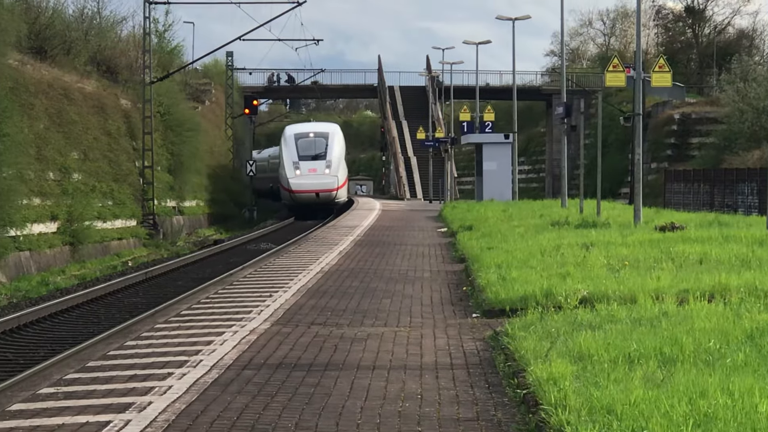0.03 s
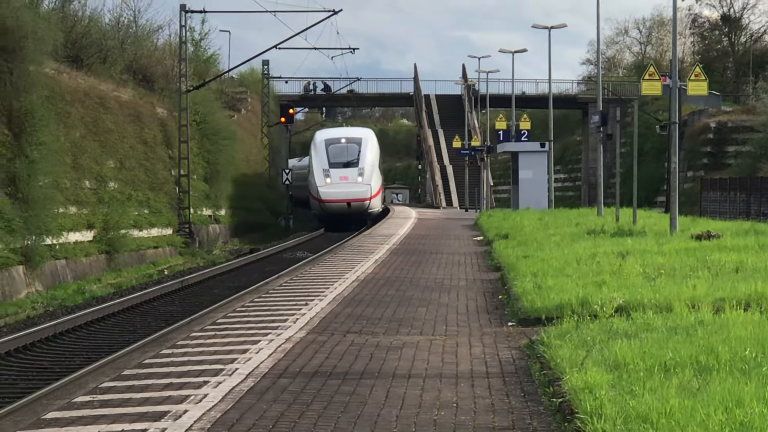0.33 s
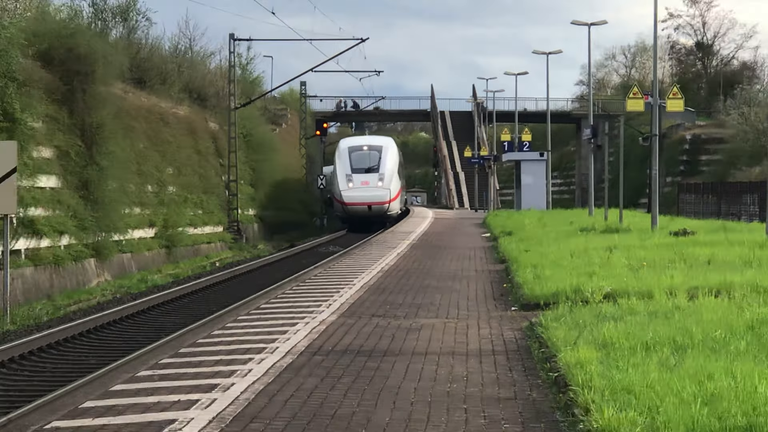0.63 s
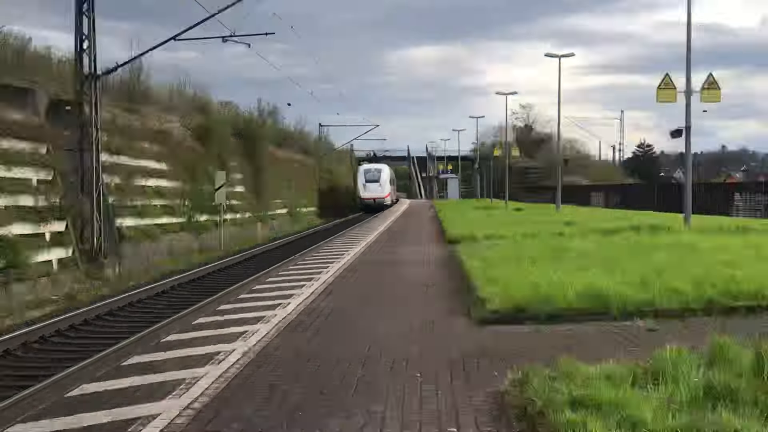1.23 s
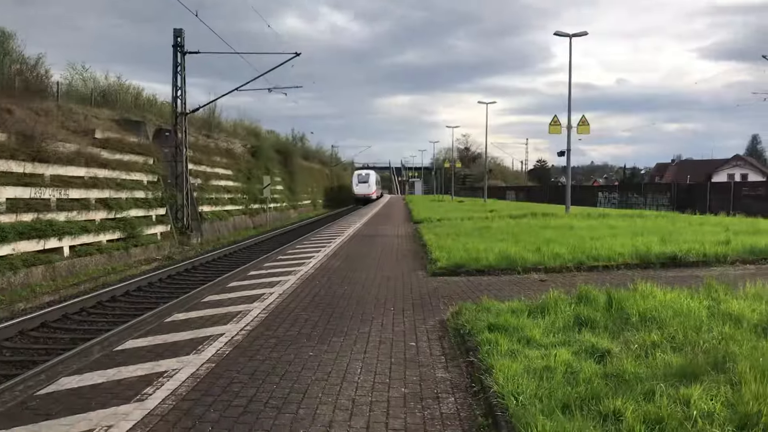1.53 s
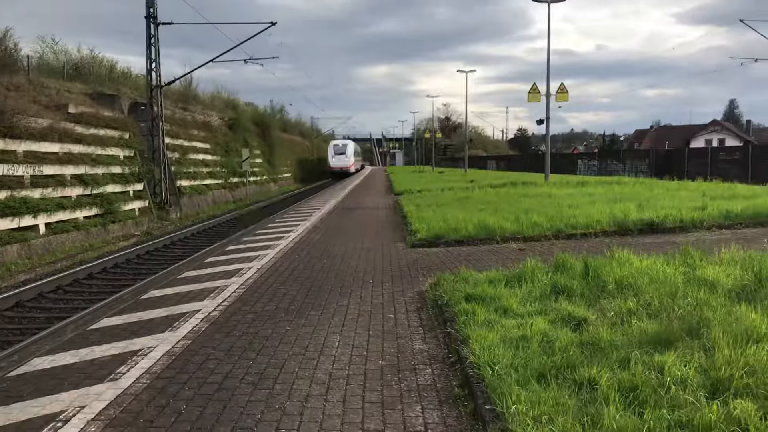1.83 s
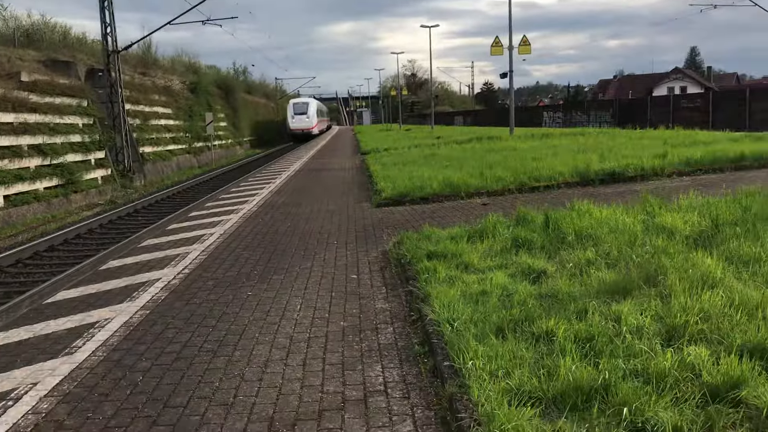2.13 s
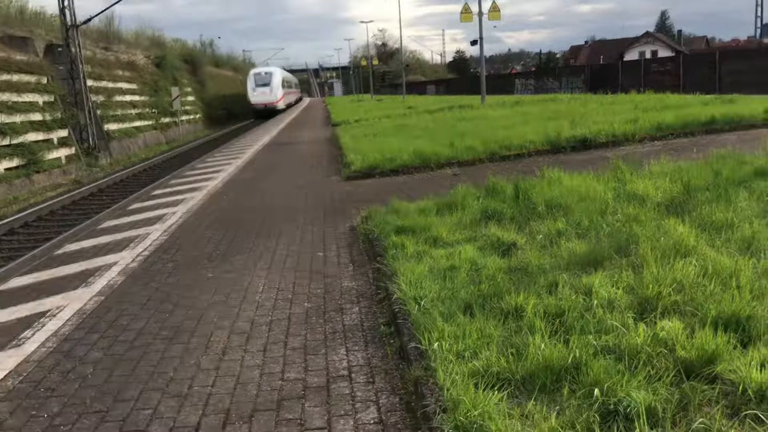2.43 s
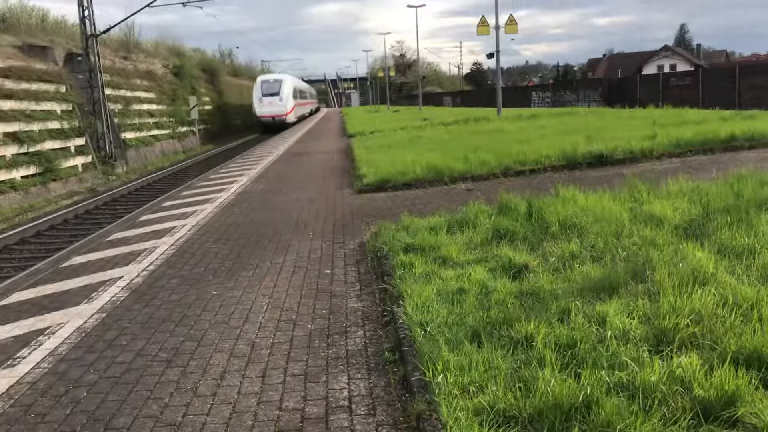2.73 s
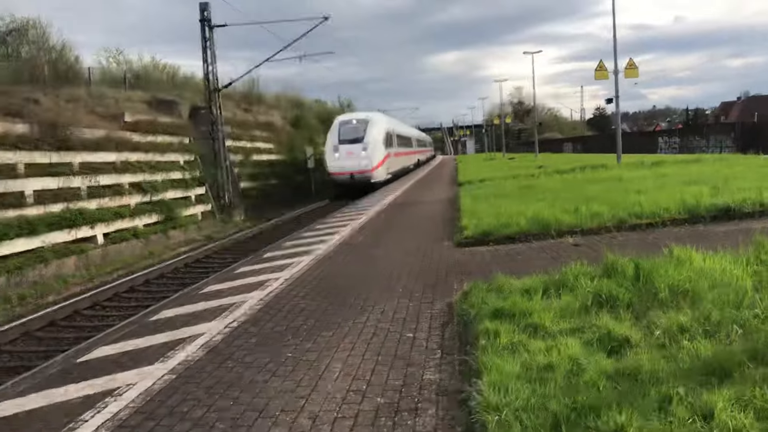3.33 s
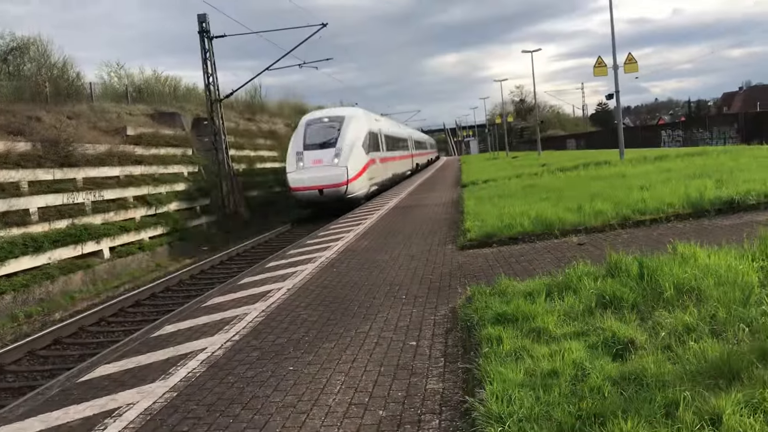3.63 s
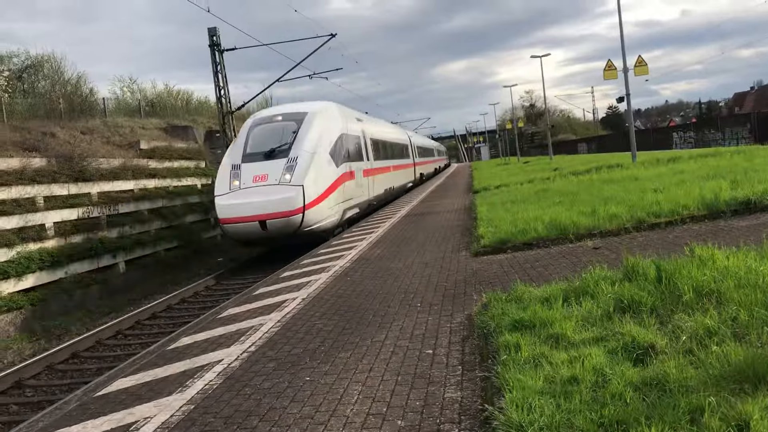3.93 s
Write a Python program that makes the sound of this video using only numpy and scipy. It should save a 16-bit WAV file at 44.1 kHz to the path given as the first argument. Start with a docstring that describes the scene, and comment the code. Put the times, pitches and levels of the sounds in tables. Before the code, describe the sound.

An electric train nears an open-air platform, its rushing wheel noise growing beneath a high metallic ringing and thin sizzle from the rails. Low gusts buffet the microphone, and a very brief hoot comes near the end.

```python
"""Fast electric train nearing a platform

Out in the open air, the wheels set the rails singing and hissing well ahead of the train.
The song spreads downward as the roar of wheels and air swells, with a few ticks and a brief hoot.
Gusts buffet the microphone with low thumps and rough puffs, over a steady distant rumble."""
import sys
import numpy as np
from scipy import signal
from scipy.io import wavfile
from scipy.ndimage import uniform_filter1d

SR = 44100
rng = np.random.default_rng(int(sys.argv[2]) if len(sys.argv) > 2 else 0)


def int16_out(signal):
    """Quantize to a 16-bit WAV file."""
    q = np.round(np.clip(np.atleast_2d(signal).T, -1, 1) * 32767)
    wavfile.write(sys.argv[1], SR, q.astype(np.int16))


N = 176400
T = np.arange(N) / SR

# Tone of the distant outdoor bed. Each row: frequency in Hz, relative level in dB.
AMBIENCE_EQ = [(20, -18), (45, 9.5), (62, 9.5), (85, -4), (130, -7), (200, -7.5), (330, -17.5), (480, -25),
               (680, -11), (850, -12.5), (1400, -18), (1900, -24.5), (2600, -31.5), (8000, -49)]

# Rise and fall of the gusts. Each row: time in seconds, level in dB.
GUST_LEVEL = [(0, -57), (.22, -25.5), (.3, -36), (.55, -22.5), (.66, -42), (.75, -31), (.86, -65),
              (1.3, -47), (1.43, -29), (1.6, -59), (1.85, -35.5), (2.1, -48), (2.35, -51), (2.56, -26),
              (2.68, -34), (2.9, -35), (3.45, -32), (3.7, -34), (4, -26)]
# Bass-heavy tone of the gusts. Each row: frequency in Hz, relative level in dB.
GUST_EQ = [(20, -33), (35, 11), (50, 3.5), (80, -0.5), (150, -6.5), (250, -17.5), (400, -26.5), (700, -56),
           (2000, -68)]
# Eddies thumping the microphone. Each row: peak time in seconds, relative peak in dB, pitch in Hz.
EDDY_HITS = [(.217, -19.5, 125), (.248, -22, 108), (0.352, -24, 115), (.386, -22, 82), (.463, -17.5, 207),
             (.490, -18.5, 159), (.502, -13.5, 74.6), (.513, -19.5, 193), (0.53, -25, 84),
             (0.607, -28.5, 72), (0.753, -26, 75.4), (.937, -19, 84.5), (1.405, -21.5, 87),
             (1.418, -22, 123), (1.459, -31, 95), (1.494, -24, 87), (1.816, -24, 87.6), (1.863, -19, 111),
             (2.41, -26, 71.5), (2.533, -17, 71.6), (2.558, -13.5, 91), (2.616, -31, 81), (2.755, -20, 72),
             (2.811, -23.5, 96), (2.888, -23, 92), (2.943, -17.5, 67.6), (3.031, -22, 122),
             (3.159, -20.5, 90), (3.26, -22, 83), (3.306, -13.5, 75.5), (3.516, -15, 108),
             (3.567, -27.5, 102), (3.691, -22, 89), (3.827, -20.5, 63.4)]
# Puffs from the hardest eddies. Each row: peak time in seconds, level in dB, half-width in seconds.
PUFF_HITS = [(.462, -25, 0.0028), (0.482, -29, 0.0019), (0.498, -23.5, 0.0035), (0.507, -35, .003),
             (0.543, -39, 0.0072), (2.554, -32, 0.0018), (3.514, -21, 0.0024)]
# Dull tone of the puffs. Each row: frequency in Hz, relative level in dB.
PUFF_EQ = [(100, -1), (220, 13.5), (400, -3), (600, -10.5), (800, -22), (1500, -45), (5000, -85)]

# Bright ticks. Each row: peak time in seconds, level in dB, half-width in seconds, low and high cut in Hz.
TICK_HITS = [(1.506, -51, 0.0025, 5000, 6400), (2.144, -43.5, 0.0077, 400, 4000),
             (2.1455, -40, .002, 7000, 15500), (2.148, -35.5, 0.001, 6800, 15500)]
# The hoot: peak time in seconds, half-width in seconds, pitch in Hz, glide in Hz per second.
HOOT_NOTE = (3.63, .024, 362, -650)

# Swell of wheels and rushing air. Each row: time in seconds, level in dB.
ROAR_LEVEL = [(0, -80), (1, -56.5), (2, -49), (2.6, -46), (3.1, -42), (3.45, -38), (3.7, -34.5), (4, -33)]
# Tone of the roar. Each row: frequency in Hz, relative level in dB.
ROAR_EQ = [(60, -1), (200, 1), (330, -2.5), (490, -10), (660, 1.5), (1150, -18.5), (1450, -1.5), (1700, -3),
           (2100, -4), (2500, -7.5), (2900, -11), (4200, -12.5), (5000, -13.5), (6800, -16), (8000, -20),
           (9500, -17.5), (10400, -21.5), (11500, -18), (16000, -36)]

# Hiss carried along the rails. Each row: time in seconds, relative level in dB.
HISS_LEVEL = [(0, -53.5), (.3, -51.5), (.8, -51.5), (1.25, -49.5), (1.7, -49.5), (2.05, -49), (2.3, -50.5),
              (2.65, -51.5), (3.15, -47.5), (3.5, -48.5), (3.8, -50), (4, -46)]
# Separate bright bands of the hiss. Each row: frequency in Hz, relative level in dB.
HISS_EQ = [(1500, -15), (2500, -10), (4200, -5.5), (4950, -12.5), (5300, -6), (5700, -12), (6550, -17),
           (7100, -3.5), (7650, -33), (8800, -32), (9550, -12), (9900, -15.5), (11000, -11.5),
           (12200, -5.5), (12900, -0.5), (14500, -2), (15300, 1.5), (16000, -4.5)]
# Thin whistles inside the hiss. Each row: frequency in Hz, width in Hz, boost in dB.
HISS_WHISTLES = [(5340, 60, 4), (9600, 60, 6), (13130, 50, 4), (14177, 35, 8), (14962, 30, 7),
                 (15277, 50, 6)]
# Surges of the highest hiss. Each row: start in seconds, level in dB, length in seconds.
HISS_SURGES = [(1.2, -48, .06), (1.822, -47, 0.12), (3.12, -53, .09)]
# Airy tone of the surges. Each row: frequency in Hz, relative level in dB.
SURGE_EQ = [(9000, -35), (11000, -7), (12500, 5), (15300, 6), (16000, -15)]

# A higher rail resonance that joins as the train nears. Each row: time in seconds, level in dB.
OVERTONE_LEVEL = [(0, -69), (1.2, -61), (1.9, -60), (2.45, -47.5), (2.8, -55.5), (3.5, -44), (4, -49)]
# Resonances of the singing rails. Each row: frequency in Hz, width in Hz, boost in dB.
RAIL_RESONANCES = [(674, 18, 7), (770, 6, 9), (845, 14, 4), (896, 16, 7), (950, 12, 4), (1000, 7, 12),
                   (1045, 12, 8), (1101, 11, 10), (1157, 10, 9), (1195, 10, 6), (1216, 10, 5),
                   (1244, 11, 9), (1372, 22, 6)]
# Arc of the rail song. Each row: time in seconds, level in dB, lower and upper band edge in Hz.
SONG_ARC = [(0, -40.5, 1160, 1290), (.5, -38, 1066, 1280), (1.02, -37.5, 1105, 1290),
            (1.15, -34.5, 1070, 1230), (1.3, -35.5, 1036, 1285), (1.75, -37.5, 950, 1314),
            (2.1, -34, 960, 1250), (2.33, -36.5, 950, 1270), (2.58, -35, 960, 1375),
            (2.85, -35.5, 855, 1280), (3.15, -33.5, 840, 1310), (3.35, -36, 820, 1290),
            (3.72, -31.5, 663, 1340), (4, -33, 646, 1340)]


def amp(db):
    """Decibels to gain."""
    return 10 ** (np.asarray(db) / 20)


def unit(x):
    """Scales to rms 1."""
    return x / np.sqrt(np.mean(x ** 2) + 1e-20)


def curve(rows, t, column=1):
    """Follows one column of an automation table through time."""
    rows = np.array(rows)
    return np.interp(t, rows[:, 0], rows[:, column])


def eq(points, hz):
    """Gain of an EQ curve at the given frequencies."""
    f, db = np.transpose(points)
    return amp(np.interp(np.log(hz + 1), np.log(f), db))


def ringing(modes, hz):
    """Power gain of narrow resonances standing above a floor of 1."""
    return 1 + sum((amp(db) ** 2 - 1) / (1 + (2 * (hz - f) / width) ** 2) for f, width, db in modes)


def bump(peak_s, half_width_s):
    """Bell-shaped envelope, down to 1/e one half-width from its peak."""
    return np.exp(-((T - peak_s) / half_width_s) ** 2)


def waver(top_hz):
    """Random wobble of rms 1, from 2 Hz up to the given rate."""
    rates = np.geomspace(2, top_hz, num=20)
    return unit(sum(np.sin(2 * np.pi * (hz * T + rng.random())) / hz ** .25 for hz in rates))


def noise(shape, patchy_db=0, size=1024):
    """Noise of rms 1 with magnitude shape(t, hz) and drifting patches of loudness."""
    t = np.arange(4 * N // size + 5)[:, None] * size / 4 / SR
    hz = np.fft.rfftfreq(size, 1 / SR)
    real, imag, patches = rng.standard_normal((3, len(t), len(hz)))
    patches = unit(uniform_filter1d(uniform_filter1d(patches, size=14, axis=0), size=14, axis=1))
    spectrum = (real + 1j * imag) * shape(t, hz) * amp(patchy_db * patches)
    return unit(signal.istft(spectrum.T, nperseg=size, noverlap=size - size // 4)[1][:N])


def ambience():
    """A steady bed of far-off outdoor rumble."""
    return amp(-37.5) * noise(lambda t, hz: eq(AMBIENCE_EQ, hz), size=4096)


def wind(eddy_boost_db=4.5, decay_cycles=0.43, rounding_s=0.00027):
    """Lumpy turbulence, plus a thump for each eddy: one pressure swing that swells and dies fast."""
    out = amp(curve(GUST_LEVEL, T)) * noise(lambda t, hz: eq(GUST_EQ, hz), patchy_db=2.2, size=2048)
    for peak_s, db, hz in EDDY_HITS:
        from_peak_s = np.hypot(T - peak_s, rounding_s) - rounding_s  # softens the envelope's tip
        envelope = amp(db + eddy_boost_db) * np.exp(-from_peak_s * hz / decay_cycles)
        out += envelope * np.cos(2 * np.pi * hz * (T - peak_s))
    return out


def puffs():
    """Brief rough bursts where the hardest eddies tear at the microphone port."""
    bursts = sum(amp(db) * bump(peak_s, half_width_s) for peak_s, db, half_width_s in PUFF_HITS)
    return bursts * noise(lambda t, hz: eq(PUFF_EQ, hz))


def ticks():
    """Tiny flecks of bright, band-passed noise."""
    out = np.zeros(N)
    for peak_s, db, half_width_s, low_hz, high_hz in TICK_HITS:
        band = signal.butter(4, [low_hz, high_hz], "band", fs=SR, output="sos")
        out += amp(db) * bump(peak_s, half_width_s) * unit(signal.sosfilt(band, rng.standard_normal(N)))
    return out


def hoot(roughness=.45):
    """A short, gritty low tone that slides down inside the roar."""
    peak_s, half_width_s, hz, glide = HOOT_NOTE
    t = T - peak_s
    grit = 1 + roughness * waver(top_hz=89.3)
    tone = np.sin(2 * np.pi * (hz * t + glide * t ** 2 / 2))
    return amp(-29.5) * grit * bump(peak_s, half_width_s) * tone


def roar():
    """Rolling wheels and rushing air: broad noise that builds as the train closes in."""
    return amp(curve(ROAR_LEVEL, T)) * noise(lambda t, hz: eq(ROAR_EQ, hz), patchy_db=1.6, size=2048)


def rail_hiss(boost_db=3, surge_fade_s=0.01):
    """Thin, very high sizzle running along the rails ahead of the train, with a few brief surges."""
    sizzle = noise(lambda t, hz: eq(HISS_EQ, hz) * np.sqrt(ringing(HISS_WHISTLES, hz)),
                   patchy_db=1.0, size=2048)
    surge_gain = sum(amp(db) * np.clip(np.minimum(T - start, start + length - T) / surge_fade_s, 0, 1)
                     for start, db, length in HISS_SURGES)
    surges = surge_gain * noise(lambda t, hz: eq(SURGE_EQ, hz))
    return amp(boost_db + curve(HISS_LEVEL, T)) * sizzle + surges


def rail_overtone(centre_hz=1885, width_hz=230):
    """A fuzzy rail resonance above the main song, coming through as the train gets closer."""
    ring = noise(lambda t, hz: 1 / (1 + (2 * (hz - centre_hz) / width_hz) ** 2), patchy_db=3.5, size=4096)
    return amp(curve(OVERTONE_LEVEL, T)) * ring


def rail_song(low_cut_order=10, high_cut_order=19, flutter_db=0.86):
    """The wheels excite narrow rail resonances inside a band whose lower edge sinks as they near."""
    def band(t, hz):
        low_cut = 1 + (curve(SONG_ARC, t, column=2) / (hz + 1)) ** (2 * low_cut_order)
        high_cut = 1 + (hz / curve(SONG_ARC, t, column=3)) ** (2 * high_cut_order)
        power = ringing(RAIL_RESONANCES, hz) / (low_cut * high_cut)
        return np.sqrt(power / power.sum(1, keepdims=True))  # same power however wide the band opens
    level_db = curve(SONG_ARC, T) + flutter_db * waver(top_hz=9.9)
    return amp(level_db) * noise(band, size=16384)


def scene():
    """The mono mix, as heard from the platform."""
    rails = rail_song() + rail_overtone() + rail_hiss()
    return (rails + roar() + ambience() + wind() + puffs() + ticks() + hoot())[None]


def record(dry, low_cut_hz=33.5, high_cut_hz=15750):
    """The microphone rolls off the deep bass, then a steep high cut trims the top."""
    low_cut = signal.butter(2, low_cut_hz, "high", fs=SR, output="sos")
    thinned = signal.sosfilt(np.tile(low_cut, (2, 1)), dry)  # two stages in series
    high_cut = signal.firwin(511, high_cut_hz, window=("kaiser", 9), fs=SR)
    return signal.oaconvolve(thinned, high_cut[None], "same")


dry = scene()
out = record(dry)
int16_out(out)
```